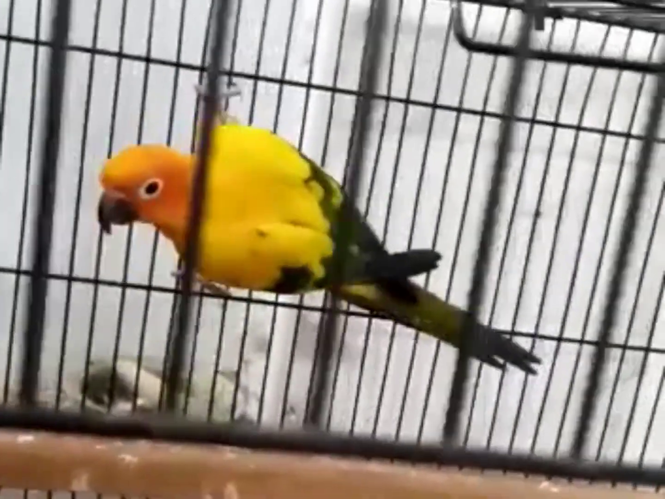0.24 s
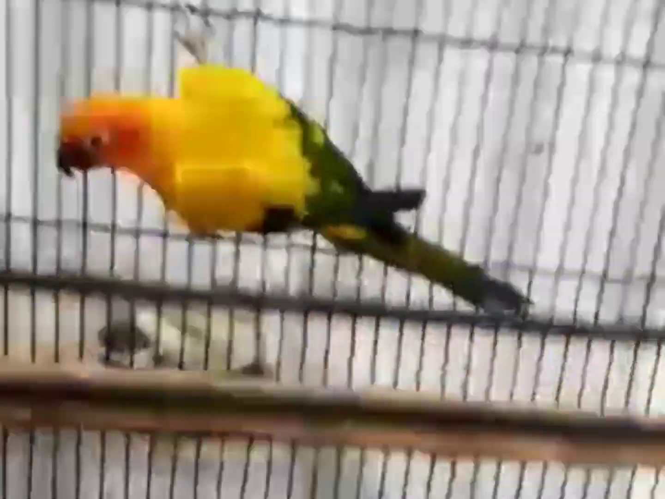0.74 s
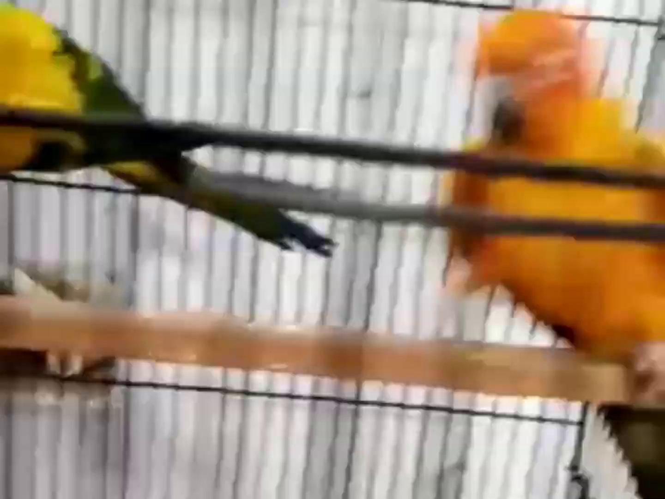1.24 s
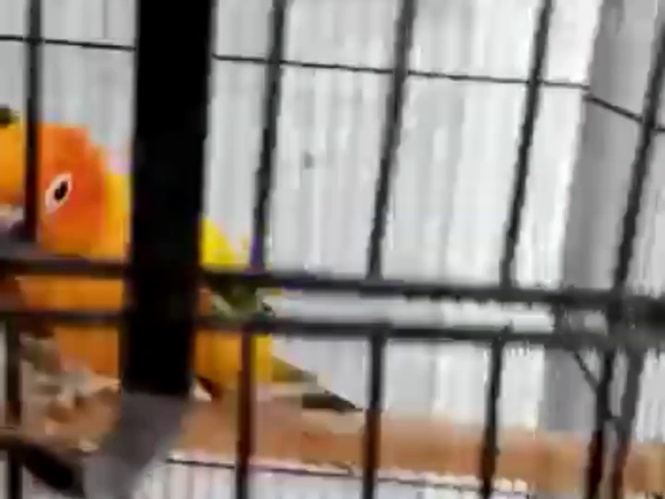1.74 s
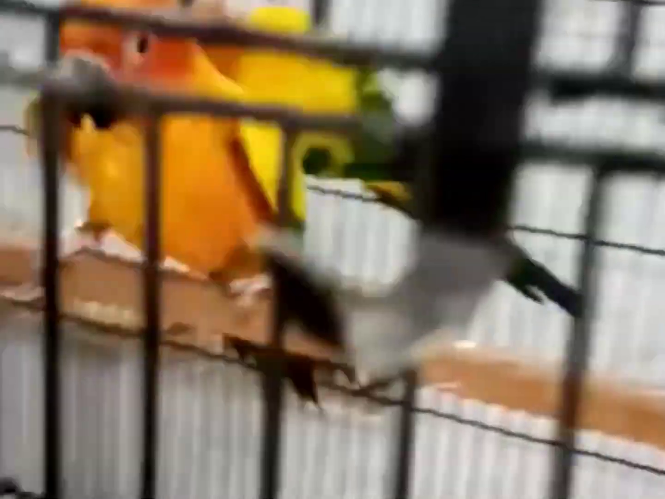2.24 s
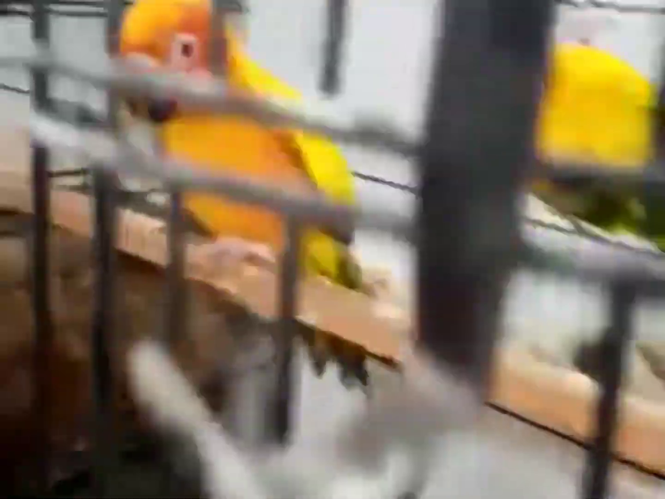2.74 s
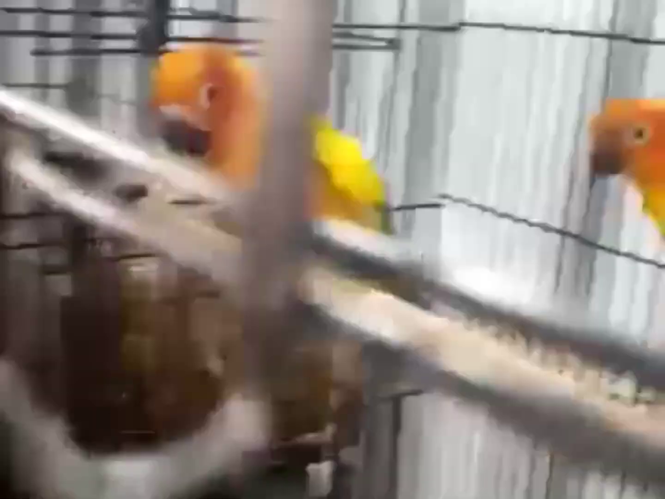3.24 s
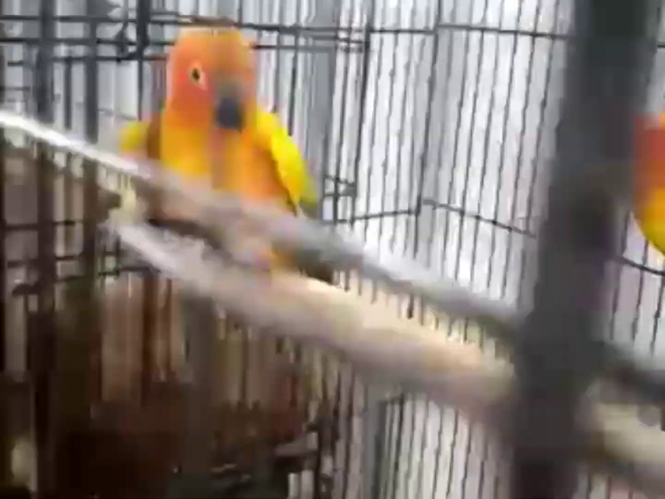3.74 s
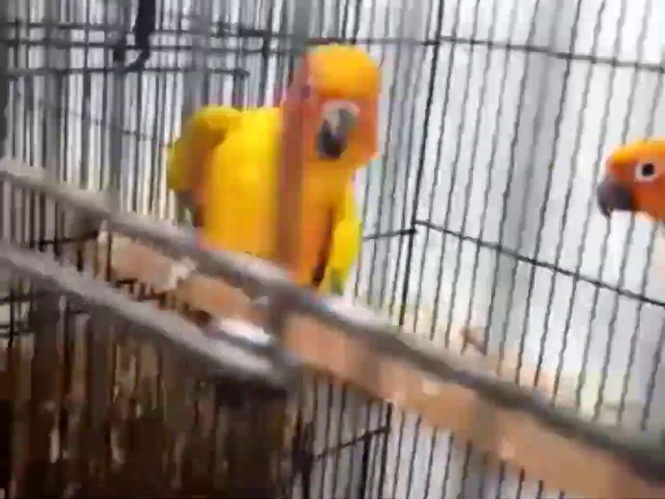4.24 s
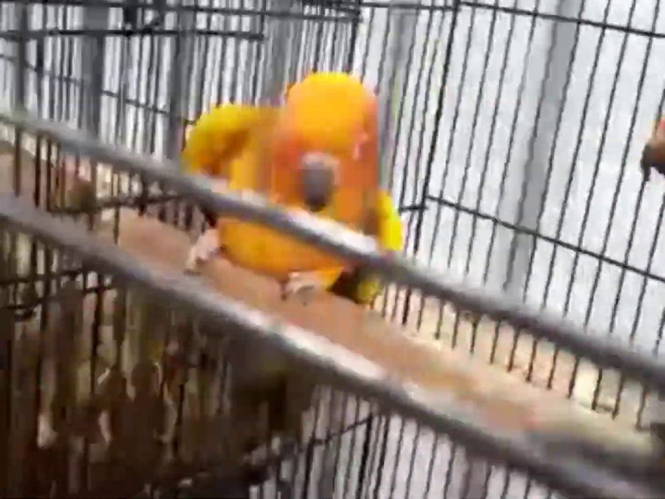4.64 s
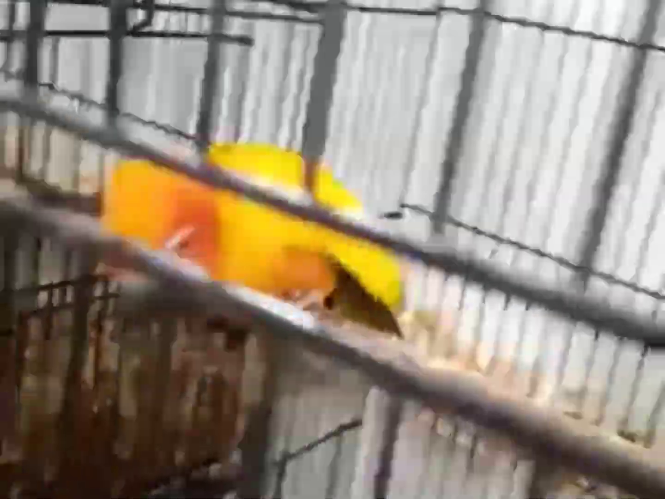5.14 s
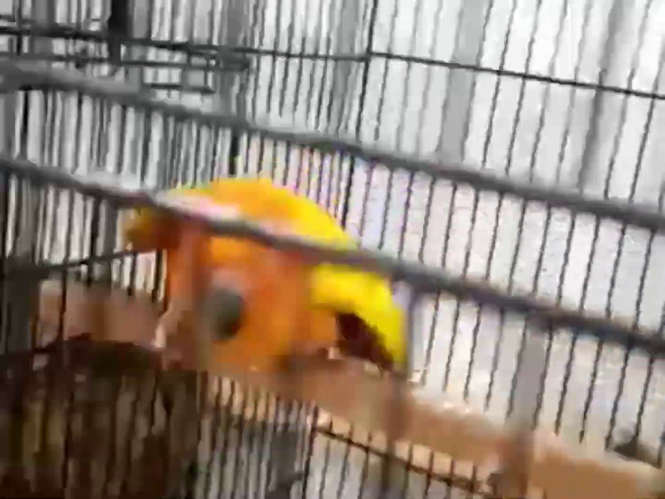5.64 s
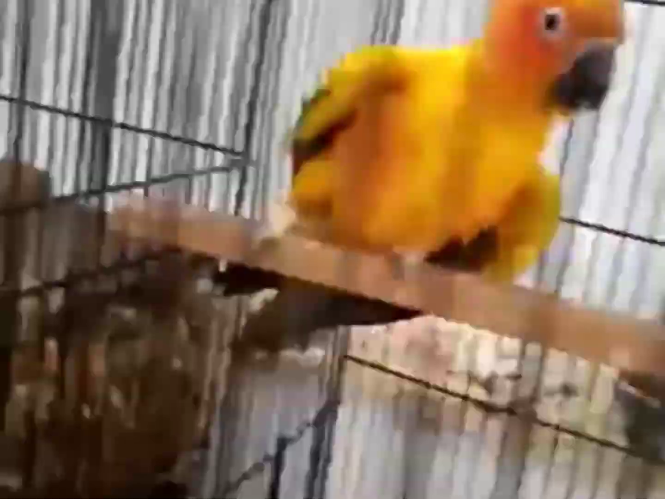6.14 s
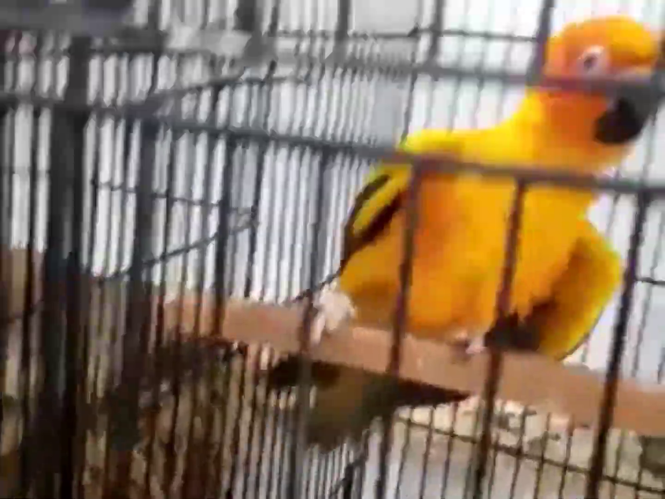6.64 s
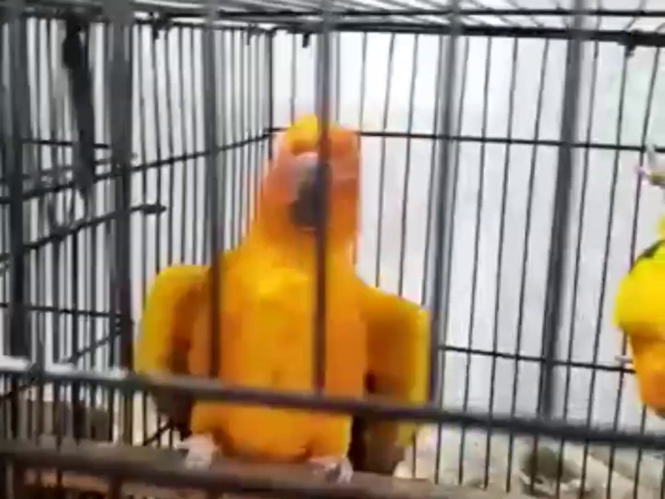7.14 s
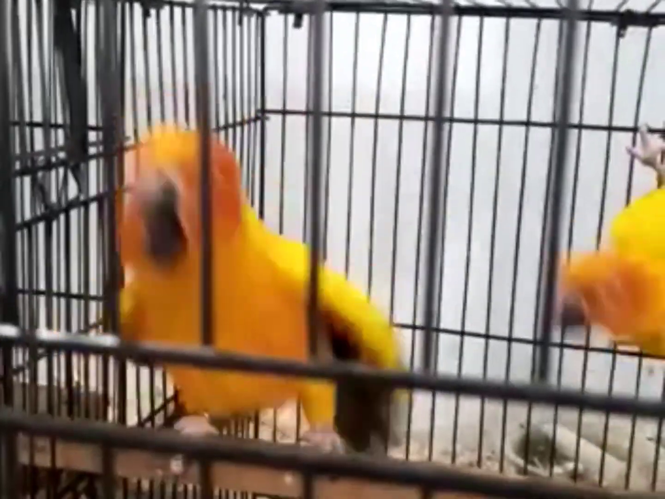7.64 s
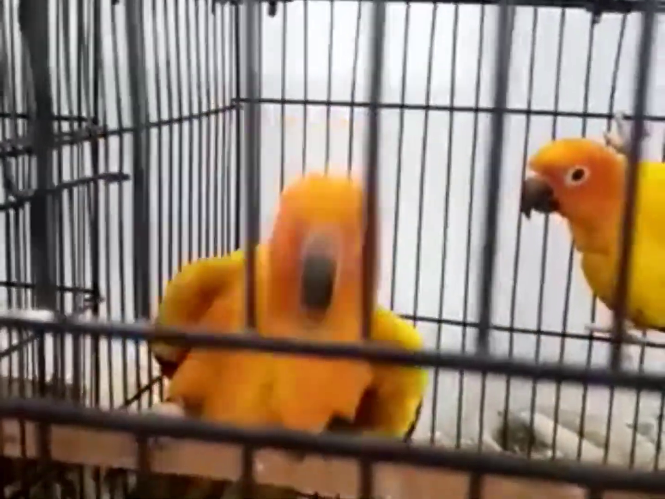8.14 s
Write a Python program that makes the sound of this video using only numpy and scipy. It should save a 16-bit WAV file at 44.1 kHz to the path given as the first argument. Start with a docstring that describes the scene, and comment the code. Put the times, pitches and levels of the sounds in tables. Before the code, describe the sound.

A steady low mains hum, fan drone and soft hiss fill a hard, lively room; the hum swells to its strongest near 3 s, then eases. Faint grainy scuffs occur around 1.5 to 2.7 s, a few with a slight wiry ring, with a soft long rub at 3.5 s and a barely audible low peep at 4.3 s. At 4.8, 5.05, 5.35 and 5.7 s a close parrot screeches, each under a fifth of a second: a rough rasp locking into a fast, piercing trill, the latter two brightest. From 6.2 to 7.5 s tiny high peeps and faint scuffs sound farther away. Two somewhat quieter screeches follow at 7.5 and 7.85 s with ringing room tails and a dull low rumble. From 8.1 s dry clicks chatter unevenly, tightening toward the end. The background ducks at each screech and quickly recovers.

```python
"""Six fast, trilled screeches of sun conures in a wire cage, in a hard-walled room near a moving camera.
Each screech is a syrinx model: a rasp that locks into beats of sweeping partials, coloured by the throat.
One bird ends with a dry chatter of resonant noise ticks. A far bird peeps in sines; things scuff in band noise.
A machine hums and drones, air hisses, low noise rumbles dully; gain control ducks the sound at each screech."""
import sys
import numpy as np
from scipy import signal
from scipy.fft import rfft, irfft, next_fast_len
from scipy.io import wavfile
from scipy.ndimage import uniform_filter1d, minimum_filter1d

SR = 44100
rng = np.random.default_rng(int(sys.argv[2]) if len(sys.argv) > 2 else 0)


def digitize_waveform(pressure):
    """Quantize a signal to 16-bit integers and store it at the path in sys.argv[1].

    Rows of a 2-D input are taken as channels; values are limited to [-1, 1].
    """
    field = np.atleast_2d(pressure).T
    bounded = np.clip(field, -1, 1)
    quanta = np.round(bounded * 32767).astype(np.int16)
    wavfile.write(sys.argv[1], SR, quanta)


N = 369558
TIME_S = np.arange(N) / SR

# Screeches. Each row: start in seconds, end in seconds, first trill rate in Hz, rate it settles to in Hz,
# level in dB, fundamental in Hz, sweep as a share of pitch, overtones in dB beside the main whistle,
# late period doubling 0-1, late fade in dB, opening rasp in seconds,
# top treble in dB as the beak turns to the camera, room tail in dB.
SCREECHES = [ (4.833, 5.022, 57.5, 77.9, -6, 2020, 0.16, -7.5, 0.34, 0, .044, 2.5, -1),
             (5.053, 5.243, 57.3, 75, -4, 2036, 0.178, -10.5, 0.18, -3, .044, 1, -5.5),
             (5.364, 5.55, 52.1, 81.2, -4.5, 1992, 0.13, -6, 0.38, -1.5, 0.031, 8, -2),
             (5.695, 5.866, 52.55, 78.8, -5, 2006, 0.13, -2.5, 0.48, -2.5, .028, 8, -2),
             (7.5154, 7.699, 60.2, 79.7, -8.5, 1980, 0.127, -1.5, 0.33, -8, .032, 2, 0),
             (7.846, 8.015, 50, 80.5, -8, 2008, 0.087, 1, 0.31, -6.5, .026, 1, 0)]
# Throat and beak response. Each row: frequency in Hz, gain in dB.
THROAT = [(500, -48), (950, -8.5), (1500, -17), (2050, -10.5), (2500, -5.5), (3000, 0), (3800, 0.5),
          (4350, -1.5), (5000, -3), (6000, -0.5), (7700, -3), (8400, -16.5), (9500, -14.5), (10600, -27),
          (12300, -31), (14000, -25), (15600, -21.5)]
# Runs of chatter ticks. Each row: start in seconds, end in seconds, ticks per second, mean tick peak in dB.
CHATTER_RUNS = [(8.086, 8.185, 43.5, -16.5), (8.194, 8.241, 116, -21.5), (8.261, 8.32, 41, -21),
                (8.329, 8.379, 100, -20.5)]
# Throat resonances in chatter, each set applied twice.
# Each row: frequency in Hz, width in Hz, gain in dB per pass.
CHATTER_LOW = [(990, 500, -6), (2110, 1400, -3.5)]
CHATTER_HIGH = [(3400, 380, -3), (3650, 370, -3.5)]
# Thin peeps. Each row: start in seconds, length in seconds, pitch in Hz, level in dB before the far gain.
PEEPS = [(4.29, 0.4, 1125, -51.5), (6.246, 0.055, 5480, -44), (6.37, 0.15, 5520, -43.5),
         (6.575, .09, 5520, -35.5), (6.97, 0.08, 5450, -37.5), (7.17, 0.049, 5480, -41.5),
         (7.417, 0.06, 5480, -35.5)]
# Soft scuffs. Each row: start in seconds, length in seconds, level in dB before the far gain,
# centre in Hz, width in octaves.
SCUFFS = [(0.016, .12, -46, 1550, 0.13), (1.451, 0.28, -39.5, 3560, 0.78), (1.575, 0.076, -37, 2180, 0.39),
          (1.964, 0.078, -39.5, 3640, 0.69), (2.467, 0.17, -34, 3000, 0.71), (2.598, 0.065, -35, 910, 0.77),
          (2.628, 0.044, -30.5, 2900, 0.49), (3.5, 0.38, -41, 2470, 0.57), (6.77, 0.17, -43, 6550, 0.22),
          (7.01, 0.14, -46, 6450, 0.22)]
# Cage wire resonances. Each row: frequency in Hz, width in Hz, gain in dB.
WIRES = [(1420, 30, 7), (1443, 36, 14), (2040, 39, 1), (2700, 22, 3), (2990, 27, -8), (3840, 25, -2),
         (4260, 26, 1)]
# Low, dull rumbles under the scene. Each row: start in seconds, length in seconds, level in dB.
RUMBLES = [(3.15, 1, -46.5), (7.77, 0.1, -34), (8.12, 0.35, -35)]
# Fan tones. Each row: frequency in Hz, level in dB beside the drone, dB more at the loud spot.
FAN_TONES = [(154, -4.5, -6), (280, -21, 14.5)]
# Drone spectrum. Each row: frequency in Hz, gain in dB.
DRONE_COLOUR = [(25, -35), (48, -11), (62, -9.5), (85, -6), (125, 3), (155, -3), (215, -3.5), (250, -7.5),
                (285, -0.5), (360, -5), (470, -14.5), (800, -27.5), (2000, -40)]
# Room hiss spectrum. Each row: frequency in Hz, gain in dB.
AIR_COLOUR = [(290, -14), (500, -1), (944, -4), (1090, -3.5), (1220, -4.5), (1610, -3.5), (2310, -3.5),
              (3270, -0.5), (4000, -4), (4560, -2.5), (5500, -8), (6930, -3), (8250, -18), (13300, -23),
              (15800, -13)]
# Room decay. Each row: frequency in Hz, time to fall 60 dB in seconds.
ROOM_DECAY = [(300, .5), (2000, .56), (4000, .46), (7000, .42), (10000, .37), (15000, .28)]

# Opening rasp: weak, low and rough until the syrinx locks; drop is a share of pitch
RASP_DB, RASP_DROP, RASP_ROUGH, WHISTLE_ROUGH = -9.5, .42, 0.68, 0.062
SWELL_START_DB, RELEASE_S = -11.5, 0.0069
END_SAG = 0.0378  # share of pitch lost as the air runs out
QUICKEN_S = 0.0695  # time constant of the trill rate
OPEN_FIRST, OPEN_LAST = 0.548, 1.28  # open share of a beat; above 1 the gate no longer shuts before the beat ends
SWEEP_FIRST, SWEEP_LAST = 1.62, 0.84  # factors on the sweep
DOUBLING_FROM, DOUBLING_RISE = 0.55, 0.26  # shares of a screech's length
FUNDAMENTAL_DB = -4  # beside the main whistle, plus half the overtone level
BEAM_HZ = 13000  # the beak beams sound forward around and above this
BEAK_SHUTS_AT_S, BEAK_SHUTS_S = 8.28, 0.036  # middle and pace of the closing
PUFF_OPEN_S, PUFF_SHUT_S = 0.0066, 0.0009  # puff decay
LOW_OPEN_DB, LOW_SHUT_DB = -1.5, -3.5  # low resonances beside the high
WIRE_FROM_DB, WIRE_GROWTH = -33, 3.5  # scuff level of no added wire gain; wire gain in dB per dB above it
HUM_HZ, HUM_DB, HUM_SWELL_DB = 100, -48, 14
LOUD_SPOT_AT_S, LOUD_SPOT_S = 3.09, 2.55  # middle and half width to 1/e
DRONE_START_DB, DRONE_END_DB = -43.5, -40.5
AIR_START_DB, AIR_END_DB = -42, -44.5
TAIL_TILT_DB = -1  # per octave above 1 kHz: the tail is duller than the direct sound
EDGE_HZ = 15900


def screech(start_s, end_s, first_hz, last_hz, loud_db, pitch_hz, sweep, overtones_db, doubling, fade_db,
            rasp_s, beam_db, shimmer_db=2.0, partial_db=3.5, beat_fade_db=-7, waver=0.0047, grit=0.071,
            noise=1.73, merge=0.094):
    """The syrinx locks from rasp to whistle; beats dip, sweep up and quicken, then merge as effort grows."""
    t = np.arange(int((end_s - start_s) * SR)) / SR
    size = len(t)
    share = t / t[-1]
    rasp = np.exp(-(t / rasp_s) ** 3)
    late = np.clip(3 * share - 2, 0, 1)
    rough = WHISTLE_ROUGH + RASP_ROUGH * rasp
    effort_db = RASP_DB * rasp + SWELL_START_DB * (1 - share) ** 2 + fade_db * late
    effort_db += shimmer_db * wander(size, 60)

    # Trill: beat phase 0-1 and its gate
    trill_hz = last_hz + (first_hz - last_hz) * np.exp(-t / QUICKEN_S)
    beat = np.cumsum(trill_hz) / SR % 1
    opening = OPEN_FIRST + (OPEN_LAST - OPEN_FIRST) * share
    gate = np.clip(beat / .13, 0, 1) * np.clip((opening - beat) / .2, 0, 1)
    gate *= amp(beat_fade_db * beat)
    gate = gate + merge * share ** 4 * (1 - gate)

    # Pitch
    reach = sweep * (1 - rasp) * (SWEEP_FIRST + (SWEEP_LAST - SWEEP_FIRST) * share)
    glide = np.interp(beat / np.minimum(opening, 1), [0, .17, .5, .78, 1], [-.25, -.45, .15, .5, 0])
    jitter = grit * rough * wander(size, 900) + waver * wander(size, 64)
    slow_hz = pitch_hz * (1 - RASP_DROP * rasp - END_SAG * late ** 4)
    hz = slow_hz * (1 + reach * glide + jitter)
    phase = 2 * np.pi * np.cumsum(hz) / SR

    # Partials; half-integer ones are the late period doubling
    halves = doubling * np.clip((share - DOUBLING_FROM) / DOUBLING_RISE, 0, 1)
    tone = np.zeros(size)
    for k in np.arange(2, 36) / 2:
        if k == 2:  # the main whistle
            weight = 1
        else:
            side_db = FUNDAMENTAL_DB + .5 * overtones_db if k == 1 else overtones_db * (1 - rasp)
            weight = amp(side_db + partial_db * wander(size, 180))
        if k % 1:
            weight = weight * halves
        audible = k * hz < SR / 2
        tone += weight * audible * np.cos(k * phase + 2 * np.pi * rng.random())

    hiss = noise * rough * rng.standard_normal(size)
    release = np.clip((t[-1] - t) / RELEASE_S, 0, 1)
    drive = gate * amp(effort_db) * (tone + hiss) * release

    def throat_db(f):
        """Throat response plus the forward treble of the beak."""
        beam = .5 + .5 * np.tanh(2 * np.pi * (f / BEAM_HZ - 1))
        return at_hz(THROAT, f) + beam_db * beam

    return amp(loud_db) * unit(colour(drive, throat_db))


def chatter(uneven_db=0.5):
    """Dry noise puffs ring the throat; as the beak shuts they shorten and their low resonances weaken."""
    out, t = np.zeros(N), np.arange(SR // 36) / SR
    for start_s, end_s, rate_hz, db in CHATTER_RUNS:
        for s in np.arange(start_s, end_s, 1 / rate_hz):
            shut = .5 + .5 * np.tanh((s - BEAK_SHUTS_AT_S) / BEAK_SHUTS_S)
            decay_s = PUFF_OPEN_S + (PUFF_SHUT_S - PUFF_OPEN_S) * shut
            puff = rng.standard_normal(len(t)) * np.exp(-t / decay_s)
            low_db = LOW_OPEN_DB + (LOW_SHUT_DB - LOW_OPEN_DB) * shut
            high = unit(ring(ring(puff, CHATTER_HIGH), CHATTER_HIGH))
            low = unit(ring(ring(puff, CHATTER_LOW), CHATTER_LOW))
            tick = high + amp(low_db) * low
            tick_db = db + uneven_db * rng.standard_normal()
            add(out, s, amp(tick_db) * tick / abs(tick).max())
    return out


def peeps(flutter_db=2):
    """Faint, quavering sine whistles that sag a little."""
    out = np.zeros(N)
    for s, length_s, hz, db in PEEPS:
        u = np.linspace(0, 1, int(length_s * SR))
        pitch_hz = hz * (1 + .025 * (np.exp(-4 * u) - .25) + .006 * wander(len(u), 150))
        whistle = np.sin(2 * np.pi * np.cumsum(pitch_hz) / SR)
        level = amp(db + flutter_db * wander(len(u), 33))
        add(out, s, level * np.sin(np.pi * u) ** .5 * whistle)
    return out


def scuffs(grain_db=3):
    """Grainy rubs of noise in one band; the harder ones ring the cage wires more strongly."""
    out = np.zeros(N)
    for s, length_s, db, hz, octaves in SCUFFS:
        size = int(length_s * SR)
        rub = rng.standard_normal(size) * amp(grain_db * wander(size, 250))
        rub = colour(rub, lambda f: -14 * np.log10(1 + (np.log2((f + 1) / hz) / octaves) ** 4))
        rub = amp(db) * unit(rub) * signal.windows.tukey(size, .7)
        rub = np.pad(rub, (0, SR // 8))  # room for the ring
        wires = amp(WIRE_GROWTH * (db - WIRE_FROM_DB)) * ring(rub, WIRES)
        add(out, s, rub + wires)
    return out


def rumbles(centre_hz=152, width_hz=40):
    """Low, dull rumbles: low-passed noise through one resonance, faded in and out."""
    out = np.zeros(N)
    for s, length_s, db in RUMBLES:
        size = int(length_s * SR)
        low_noise = colour(rng.standard_normal(size), lambda f: -20 * np.log10(1 + (f / 220) ** 4))
        rumble = unit(ring(low_noise, [(centre_hz, width_hz, 0)]))
        add(out, s, amp(db) * rumble * signal.windows.tukey(size, .5))
    return out


def machine(waver_db=1.0, throb_db=1.5):
    """Mains hum and a growing fan drone with two tones; the camera passes through a loud spot once."""
    swell = np.exp(-((TIME_S - LOUD_SPOT_AT_S) / LOUD_SPOT_S) ** 2)
    hum = np.sqrt(2) * np.sin(2 * np.pi * HUM_HZ * TIME_S + 0.064 * wander(N, 7))
    hum_db = HUM_DB + HUM_SWELL_DB * swell + waver_db * wander(N, 6.6)
    drone = unit(colour(rng.standard_normal(N), lambda f: at_hz(DRONE_COLOUR, f)))
    for hz, db, swell_db in FAN_TONES:
        tone = np.sqrt(2) * np.sin(2 * np.pi * hz * TIME_S + 0.81 * wander(N, 11))
        drone = drone + amp(db + swell_db * swell) * tone
    throb = amp(throb_db * wander(N, 8.9))
    return hum * amp(hum_db) + drone * drift(DRONE_START_DB, DRONE_END_DB) * throb


def air(flicker_db=1.09):
    """Room hiss: coloured noise that flickers slightly and eases."""
    hiss = unit(colour(rng.standard_normal(N), lambda f: at_hz(AIR_COLOUR, f)))
    return hiss * drift(AIR_START_DB, AIR_END_DB) * amp(flicker_db * wander(N, 40))


def room(x, tail_db, near_db):
    """Six quick reflections from cage and wall, then a dense tail that dies by band."""
    sparse = rng.standard_normal(SR) * (rng.random(SR) < .1)
    hz, t, z = signal.stft(sparse, SR, nperseg=256)
    decay = amp(-60 * t / at_hz(ROOM_DECAY, hz)[:, None])
    onset = np.clip(t / .012, 0, 1)
    tail = signal.istft(z * decay * onset, SR, nperseg=256)[1]
    tail = tail / np.linalg.norm(tail)
    response = amp(tail_db) * colour(tail, lambda f: TAIL_TILT_DB * np.log2(np.maximum(f, 1000) / 4000))
    response[0] += 1  # direct sound
    delays = (np.geomspace(.0012, .009, 6) * rng.uniform(.85, 0.92, 6) * SR).astype(int)
    response[delays] += amp(near_db) * rng.choice([-1, 1], 6)
    return signal.fftconvolve(x, response)[:N]


def ring(x, modes):
    """Sum of resonances given as (Hz, width Hz, dB)."""
    return sum(amp(db) * signal.lfilter(*signal.iirpeak(hz, hz / width_hz, SR), x)
               for hz, width_hz, db in modes)


def colour(x, db_at):
    """Filters by a function that gives dB for each frequency."""
    size = next_fast_len(len(x) + 1024)
    gain = amp(db_at(np.fft.rfftfreq(size, 1 / SR)))
    return irfft(rfft(x, size) * gain, size)[:len(x)]


def wander(size, hz):
    """Random curve of rms about 1, low-passed softly at hz."""
    padded = next_fast_len(size + 8192)
    f = np.fft.rfftfreq(padded, 1 / SR)
    spectrum = rfft(rng.standard_normal(padded)) * np.exp(-(f / hz) ** 2)
    return unit(irfft(spectrum, padded))[:size]


def drift(start_db, end_db):
    """Gain that slides evenly in dB over the whole scene."""
    return amp(np.linspace(start_db, end_db, N))


def at_hz(points, hz):
    """Reads a table on a log-frequency axis."""
    f, value = np.transpose(points)
    return np.interp(np.log(hz + 1), np.log(f), value)


def amp(db):
    """Decibels to gain."""
    return 10 ** (np.asarray(db) / 20)


def unit(x):
    """Scales to rms 1."""
    return x / np.sqrt(np.mean(x ** 2) + 1e-20)


def add(mix, s, sound):
    """Adds a sound into the mix at s seconds."""
    part = mix[max(round(s * SR), 0):][:len(sound)]
    part += sound[:len(part)]


def scene():
    """Near birds, each call with its own reflections and room tail; far small sounds; the background."""
    near = room(chatter(), tail_db=-5, near_db=-17)
    for *call, room_db in SCREECHES:
        add(near, call[0], room(screech(*call), tail_db=room_db, near_db=-20))
    far = amp(-4) * room(scuffs() + peeps(), tail_db=-0.5, near_db=-16.5)
    return (near + far + machine() + air() + rumbles())[None]


def record(dry, threshold_db=-20.0, squeeze=0.63, recovery_db_per_s=200):
    """Gain control falls within milliseconds, holds briefly and recovers steadily; then a low-pass."""
    power = abs(uniform_filter1d(dry[0] ** 2, size=260))
    power_db = 10 * np.log10(power + 1e-12)
    hold = SR // 30
    held_db = -minimum_filter1d(-power_db, size=hold, origin=(hold - 1) // 2)  # running maximum of the past
    fall_db = TIME_S * recovery_db_per_s
    envelope_db = np.maximum.accumulate(held_db + fall_db) - fall_db
    over_db = np.maximum(envelope_db - threshold_db, 0)
    ducked = dry * amp(-squeeze * uniform_filter1d(over_db, size=200))
    low_pass = signal.firwin(511, EDGE_HZ, window=("kaiser", 9), fs=SR)
    return signal.oaconvolve(ducked, low_pass[None], "same")


dry = scene()
out = record(dry)
digitize_waveform(out)
```